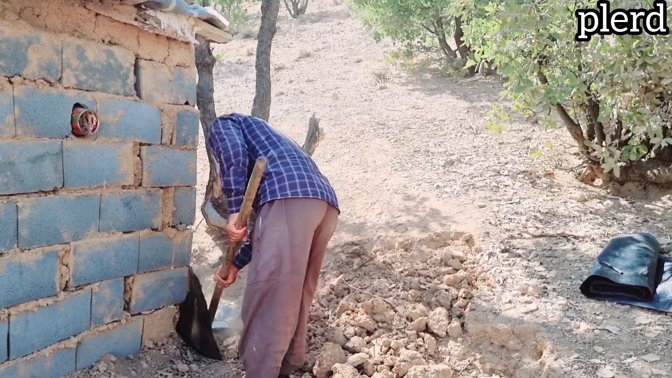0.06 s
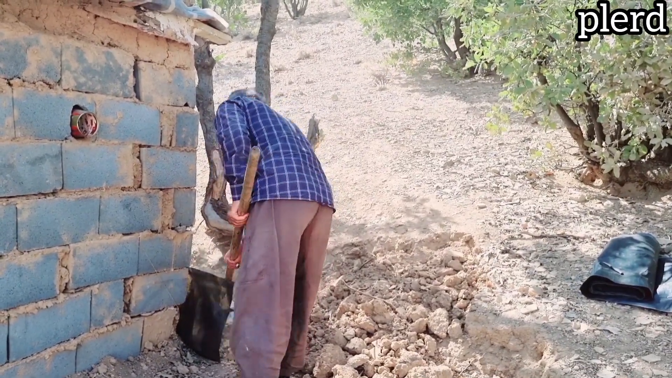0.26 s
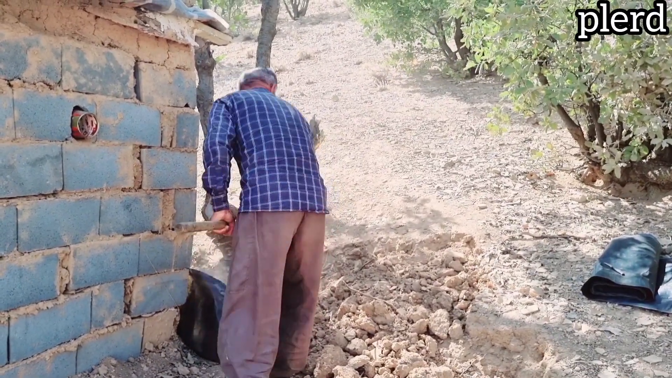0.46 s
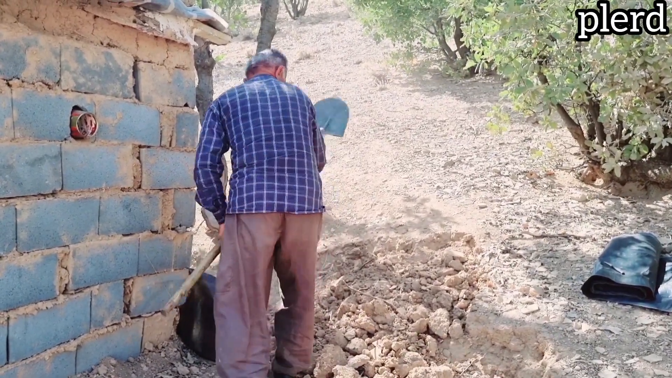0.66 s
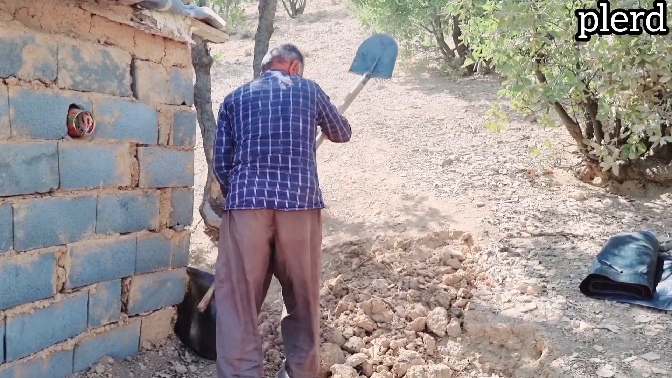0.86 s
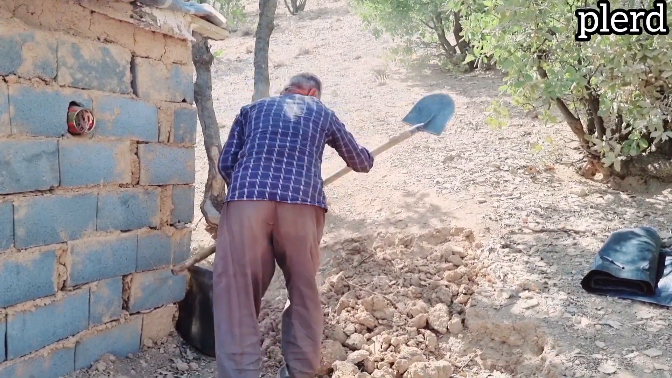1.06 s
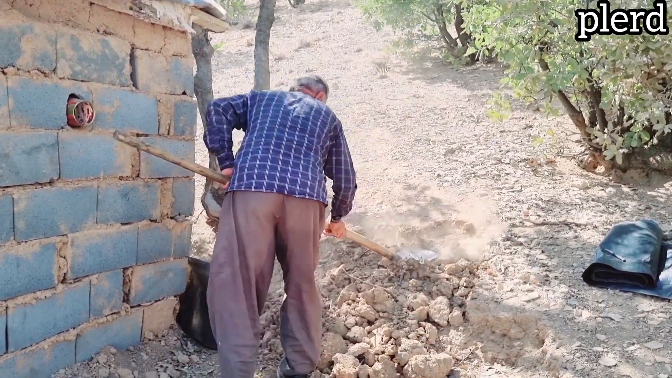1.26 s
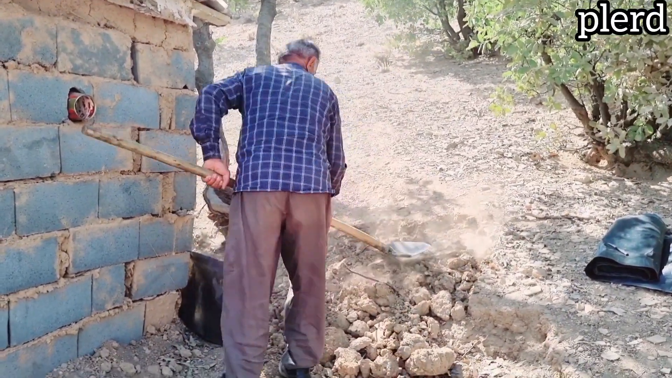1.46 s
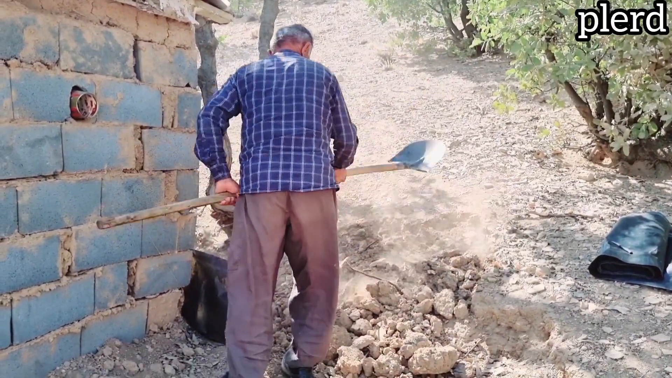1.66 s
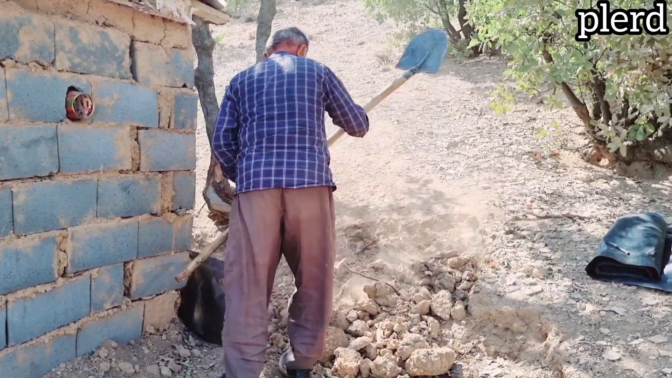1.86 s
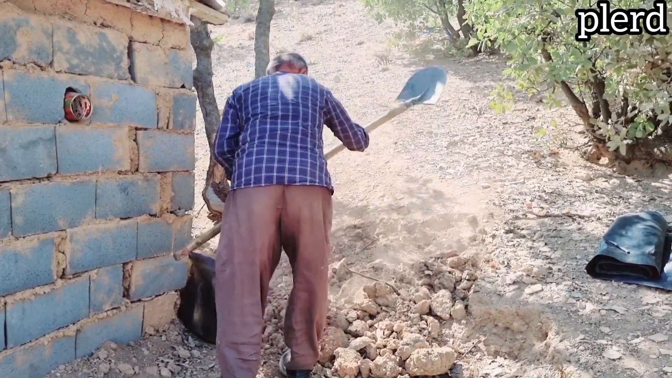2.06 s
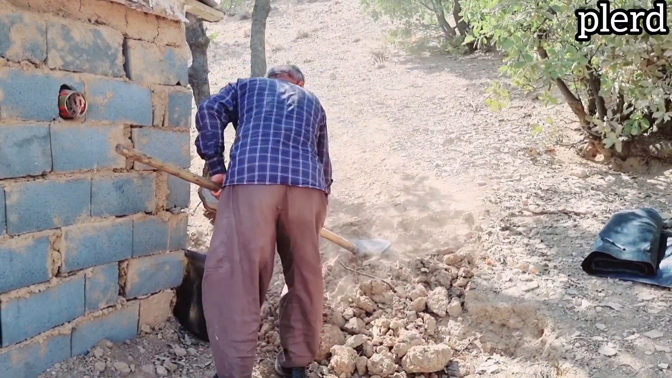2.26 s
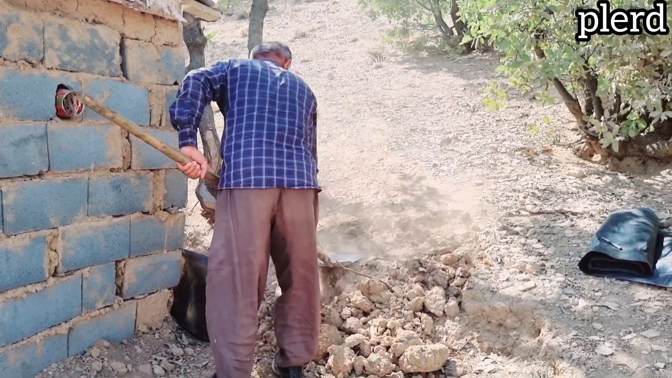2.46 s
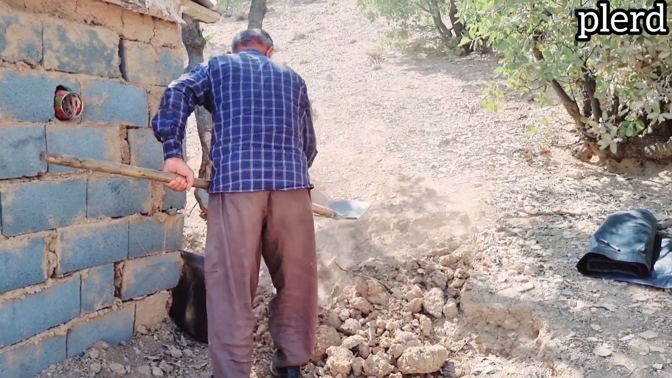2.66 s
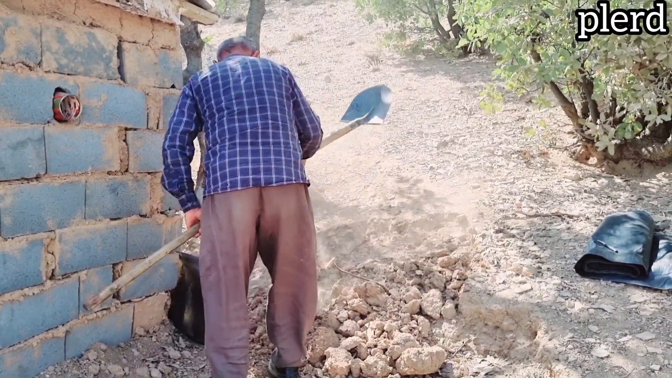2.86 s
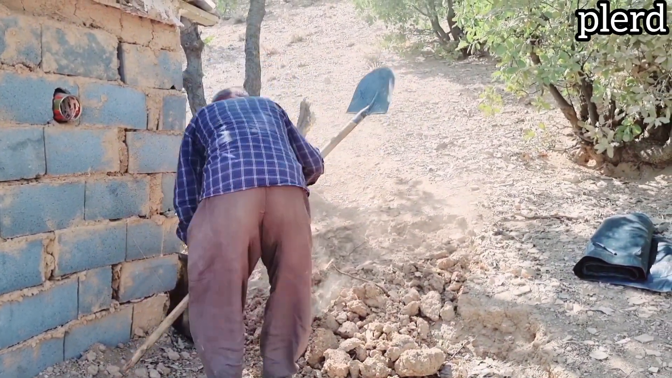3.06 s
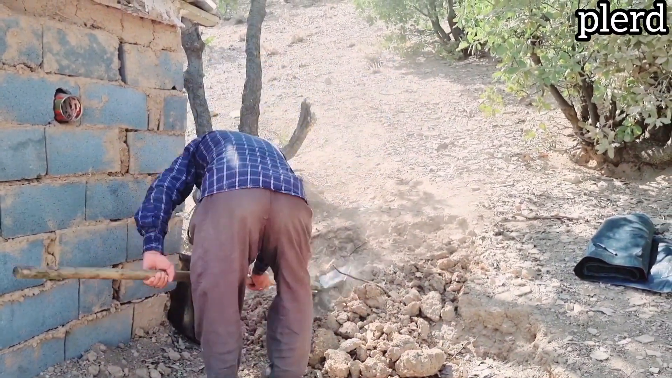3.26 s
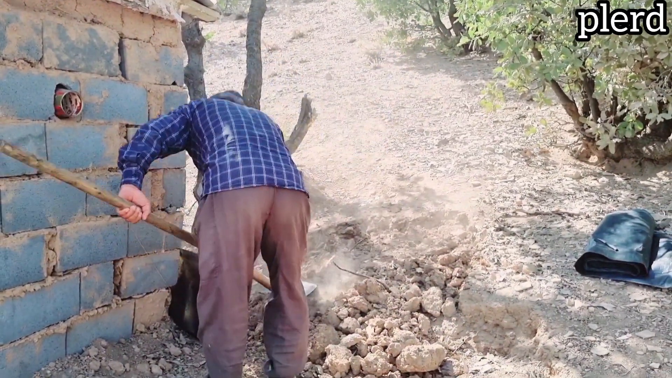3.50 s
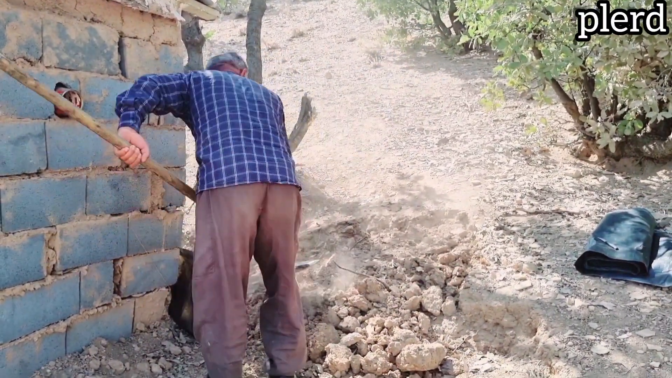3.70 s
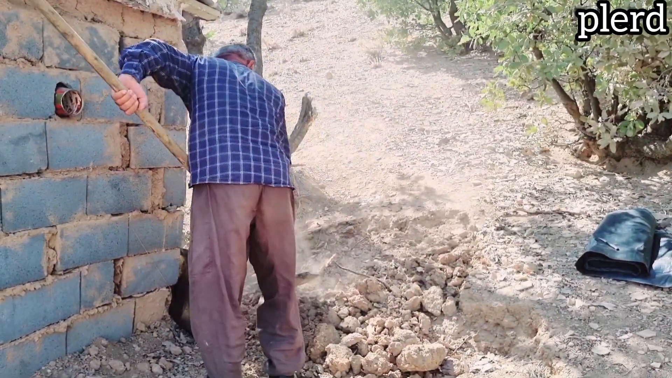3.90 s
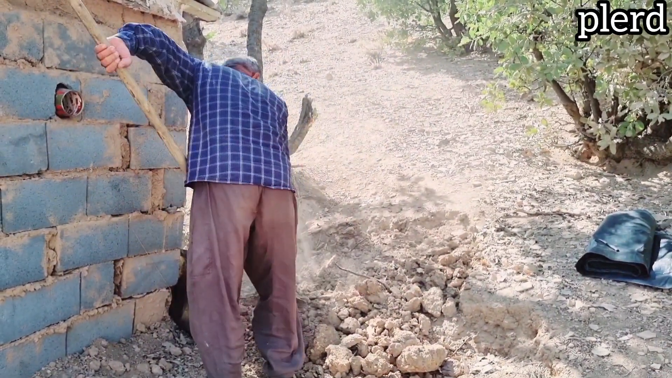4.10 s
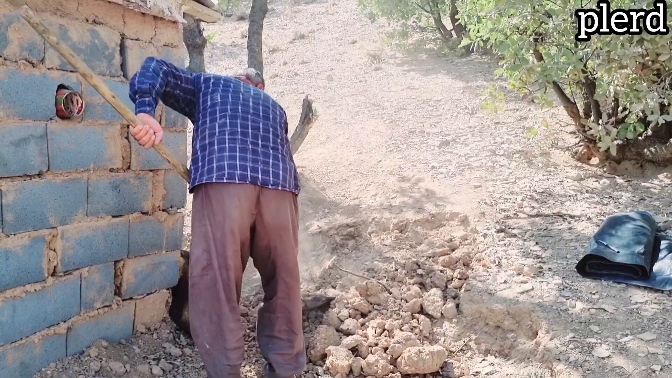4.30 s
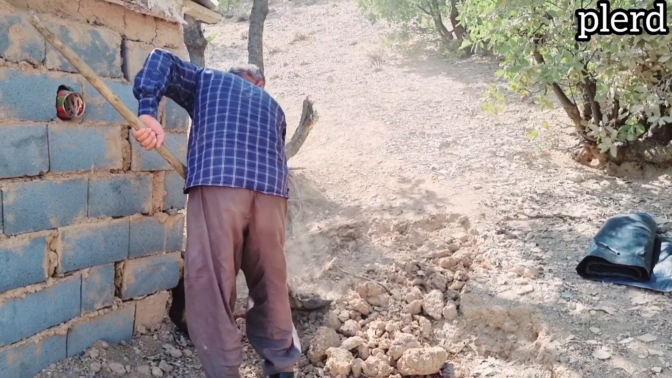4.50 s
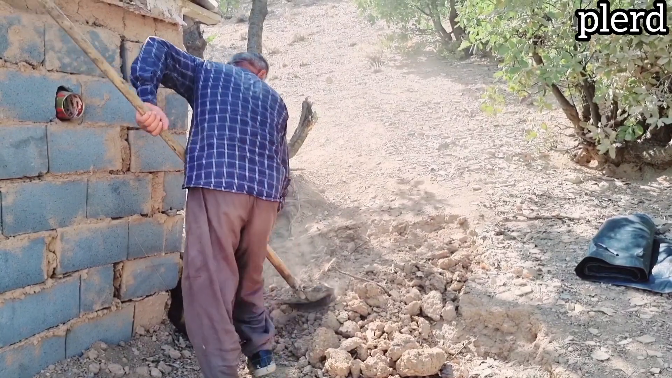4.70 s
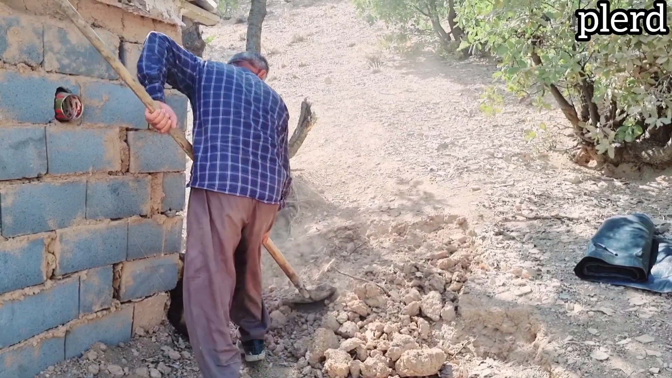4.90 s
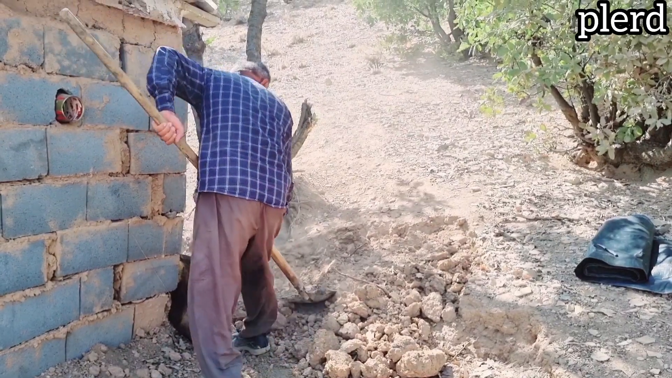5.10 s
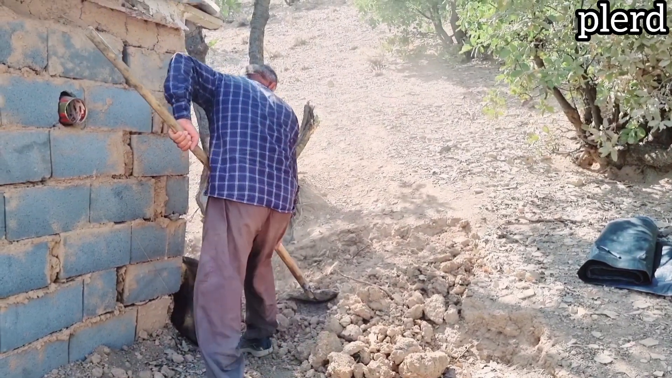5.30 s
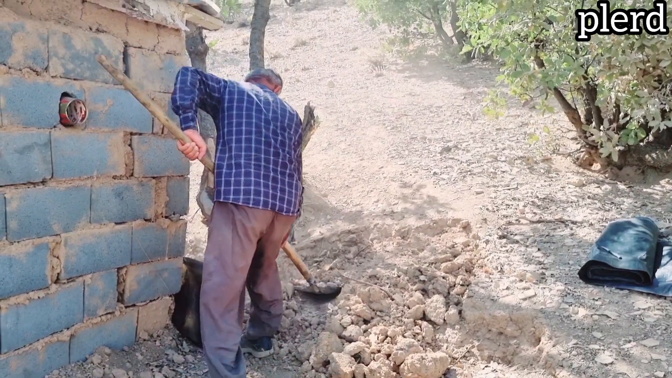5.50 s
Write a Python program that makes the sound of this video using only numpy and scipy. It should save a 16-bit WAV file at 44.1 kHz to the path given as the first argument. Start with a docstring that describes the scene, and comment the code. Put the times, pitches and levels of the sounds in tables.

```python
"""Shovel digging in stony ground

A long-handled steel shovel is swung like a pick, three times, into dry stony ground beside a block wall.
Each blow is crackling noise, a grinding blade, a low sine thud and a ring of decaying steel modes.
Between and after the blows the blade shoves, jabs and scrapes: filtered noise grains, pebbles and clinks.
Boots shuffle and short bright swishes flutter in shaped grains; wind, boots and soil rumble low in
filtered noise, and a far rooster is gliding tones."""
import sys
import numpy as np
from scipy import signal
from scipy.fft import rfft, irfft, next_fast_len
from scipy.io import wavfile

SR = 44100
rng = np.random.default_rng(int(sys.argv[2]) if len(sys.argv) > 2 else 0)


def inscribe(sig):
    """Save sig as 16-bit PCM at rate SR to the path in sys.argv[1].

    A 1-D sig is mono; a 2-D sig holds one channel per row.
    Samples are clipped to [-1, 1] before scaling.
    """
    pcm = np.round(np.clip(np.atleast_2d(sig).T, -1, 1) * 32767)
    wavfile.write(sys.argv[1], SR, pcm.astype(np.int16))


N = 244710
T = np.arange(N) / SR
LEFT_RIGHT = np.array([[1], [-1]])


def amp(db):
    """Decibels to gain."""
    return 10 ** (np.asarray(db) / 20)


def unit(x):
    """Scale to rms 1."""
    return x / np.sqrt(np.mean(x ** 2))


def fade(t, t60):
    """Exponential decay from t = 0, falling 60 dB in t60 seconds."""
    return np.exp(-np.log(1000) * np.maximum(t, 0) / t60)


def curves(rows):
    """The columns after start_s, interpolated sample by sample."""
    s, *columns = np.transpose(rows)
    return [np.interp(T, s, column) for column in columns]


def across(points, size):
    """A (pitch_hz, value) table on the bins of a transform, interpolated over log frequency."""
    hz, value = np.transpose(points)
    bin_hz = np.arange(size // 2 + 1) * SR / size
    return np.interp(np.log(bin_hz + 1), np.log(hz), value)


def through(x, response):
    """Pass each channel through an impulse response."""
    response = response.reshape((1,) * (x.ndim - 1) + (-1,))
    return signal.oaconvolve(x, response, axes=-1)[..., :x.shape[-1]]


def colour(x, points):
    """Causal minimum-phase filter with a (pitch_hz, level_db) response."""
    size = 4096
    cepstrum = irfft(np.log(amp(across(points, size))))
    # folding the cepstrum forward in time makes the filter causal
    cepstrum[1:size // 2] *= 2
    cepstrum[size // 2 + 1:] = 0
    return through(x, irfft(np.exp(rfft(cepstrum))))


def noise(n, points):
    """Steady noise with a (pitch_hz, level_db) colour, at rms 1."""
    return unit(colour(rng.standard_normal(n), points))


def wander(n, rate_hz):
    """Smooth random motion, mostly slower than a few times rate_hz, at rms 1."""
    return noise(n, [(rate_hz, 0), (4 * rate_hz, -40)])


def grains(n, per_s, spread_db):
    """Random tiny fractures of either sign and uneven strength, at rms 1."""
    hit = rng.random(n) < per_s / SR
    sign = rng.choice([-1, 1], n)
    strength = amp(spread_db * np.minimum(rng.exponential(size=n), 4))
    return unit(hit * sign * strength)


def scattered(n, per_s, spread_db, side_db):
    """Fractures strewn over the ground: above the bass, each port hears a slightly different share."""
    mid, side = grains(n, per_s, spread_db), grains(n, per_s, spread_db)
    return mid + amp(side_db) * colour(side, [(200, -10.5), (1200, 3.5)]) * LEFT_RIGHT


def add(out, s, x):
    """Mix a sound in at time s."""
    i = max(int(s * SR), 0)
    out[..., i:i + x.shape[-1]] += x[..., :N - i]


def swell(s, rise_s, hold_s, t60):
    """Envelope of one movement: it builds exponentially up to time s, holds and dies away."""
    out = np.zeros(N)
    span = slice(max(int((s - 8 * rise_s) * SR), 0), int((s + hold_s + t60) * SR))
    t = T[span] - s
    out[span] = np.exp(np.minimum(t, 0) / rise_s) * fade(t - hold_s, t60)
    return out


# modes of the steel blade, levels relative:
# pitch_hz, bedded_db (in soil), free_db (ringing free), free_t60_s
BLADE_MODES = [(911, -13.5, -19, .5), (1372, -3.5, 2.5, 0.17), (1442, -6, -11.5, .35),
               (1548, -12, -16.5, .3), (2099, -2, 4, .45), (2235, 1, -5, 1.2), (2373, -9.5, -3, 0.86),
               (2950, -4, -13, .5), (3203, -1.5, -17.5, .5), (3660, -2, 3.5, 0.46), (4226, -6, -4, .5),
               (4420, 1.5, -14.5, .4), (4810, 1.5, 0.5, .35), (4950, -18, -2.5, .4), (5150, 1.5, -7.5, .4),
               (5450, 0, -14.5, .4), (5706, 1.5, -7, 0.4), (6430, -12.5, -12.5, .35),
               (6610, -6.5, -23, .35), (6656, 0.5, -8.5, .35), (7300, -11, -10.5, .3), (7860, 1.5, -10, .3)]


def blade(t, free=False, bedded_t60=0.029):
    """The blade's ring, a sum of sine modes: choked while in the soil, long once it is free."""
    ring = 0
    for hz, bedded_db, free_db, free_t60 in BLADE_MODES:
        level = amp(free_db if free else bedded_db)
        decay = fade(t, free_t60 if free else bedded_t60)
        ring = ring + level * decay * np.sin(2 * np.pi * (hz * t + rng.random()))
    return ring if free else ring / np.linalg.norm(ring)


# the blade shoves loose ground, levering after a blow or jabbing; rise_s is a time constant:
# start_s (top of the rise), rise_s, hold_s, t60_s, grit_db, scrape_db, soil_db
SHOVES = [(0.0, .01, 0.0035, .28, -35.5, -36, -36.5), (1.163, 0.023, 0.026, 0.55, -42, -46, -56.5),
          (1.251, 0.013, .01, 0.1, -40, -47.5, -71), (1.524, 0.0042, 0.0072, .15, -55.5, -66, -75),
          (2.142, .015, 0.13, 0.22, -33.5, -47.5, -57), (2.342, 0.0074, 0.019, 0.25, -41.5, -53.5, -64.5),
          (3.222, 0.025, 0.0069, 0.21, -32, -37, -49), (3.451, .002, 0.0064, 0.19, -38.5, -39.5, -44),
          (3.839, .002, .015, 0.23, -49, -62, -63), (4.11, 0.06, 0.015, 0.17, -54, -67, -67),
          (4.151, 0.002, 0.036, .2, -34.5, -41, -52), (4.195, 0.0072, 0.013, 0.087, -32, -34.5, -43.5),
          (4.626, 0.026, 0.05, 0.14, -33.5, -38, -61), (5.057, 0.071, 0.029, 0.21, -35.5, -41.5, -57.5),
          (5.455, 0.17, 0.011, 0.31, -43, -43, -58.5)]
# boots shift on the soil: start_s (top of the rise), rise_s, hold_s, t60_s, soil_db
SHUFFLES = [(0.693, 0.027, 0.034, .6, -47), (1.607, .01, 0.026, .2, -62), (2.9, 0.042, 0.028, .35, -60),
            (3.41, .015, 0.039, 0.26, -50.5), (3.6, 0.17, 0.12, 1, -61), (4.762, .03, 0.0083, .4, -58)]


def ground_motion(trickle_db=-22, trickle_t60=1.8, boot_grit_db=-10, boot_scrape_db=-6):
    """How strongly grit runs, the blade scrapes and soil shifts; shoves and shuffles add in power."""
    power = np.zeros((3, N))
    for s, rise_s, hold_s, t60, *levels_db in SHOVES:
        push = swell(s, rise_s, hold_s, t60)
        # every shove leaves a weaker, longer trickle
        push += amp(trickle_db) * swell(s, rise_s, hold_s, trickle_t60)
        power += np.outer(amp(levels_db), push) ** 2
    for *shape, db in SHUFFLES:
        levels_db = [db + boot_grit_db, db + boot_scrape_db, db]
        power += np.outer(amp(levels_db), swell(*shape)) ** 2
    return np.sqrt(power)


def pebbles(per_s=190, low_hz=2500, high_hz=6350, t60=.028, spread_db=6.0, scatter_ms=0.099):
    """A stream of small collisions, decaying sines each with its own pitch, size and place."""
    out, t = np.zeros((2, N)), T[:SR // 25]
    for when, pitch, size, place in rng.random((int(per_s * N / SR), 4)):
        hz = low_hz * (high_hz / low_hz) ** pitch
        # the place shifts the sine's phase oppositely at the two ports
        lead_s = LEFT_RIGHT * (2 * place - 1) * scatter_ms / 1000
        level = amp(-spread_db * np.log(size + .02))
        add(out, when * N / SR, level * fade(t, t60) * np.sin(2 * np.pi * hz * (t + lead_s)))
    return unit(out)


# spectrum of running grit: pitch_hz, level_db (relative, per Hz)
GRIT_COLOUR = [(1200, -31.5), (2500, -9.5), (3500, -5.5), (5300, -2), (7400, -3), (9000, -13),
               (12000, -20.5), (16000, -18.5)]
# spectrum of the scraping blade: pitch_hz, level_db (relative, per Hz)
SCRAPE_COLOUR = [(350, -23), (650, -18.5), (880, -0.5), (1130, -15.5), (1450, 1), (1850, -5.5),
                 (2300, -2.5), (2900, -14), (4200, -25.5)]
# spectrum of soil under boots: pitch_hz, level_db (relative, per Hz)
SOIL_COLOUR = [(60, -19.5), (160, -5.5), (340, 1), (520, -7), (750, 0), (1300, -24)]


def rubble(steel_db=-8, catch_db=2.0, pebble_db=-8):
    """Grit sprays and trickles, rubs along the blade in catches and slips; pebbles roll and soil shifts."""
    running, scraping, shifting = ground_motion()
    catch = catch_db * wander(N, 72)
    grit_grains = unit(colour(scattered(N, per_s=4500, spread_db=2.0, side_db=-5.5), GRIT_COLOUR))
    grit = running * amp(catch - 2.3) * grit_grains
    rub_grains = unit(colour(scattered(N, per_s=2000, spread_db=5.5, side_db=-9), SCRAPE_COLOUR))
    rub = scraping * amp(catch - 2.5) * rub_grains
    soil = shifting * amp(0.27) * unit(colour(grains(N, per_s=380, spread_db=3.5), SOIL_COLOUR))
    stones = scraping * amp(pebble_db) * pebbles()
    steel = through(grit + rub, blade(T[:SR // 16]))
    return grit + rub + soil + stones + amp(steel_db) * steel


# short bright swishes; rise_s is a time constant:
# start_s (top of the rise), rise_s, hold_s, t60_s, level_db (before flutter)
SWISHES = [(0.0, 0.012, .02, 0.8, -45.5), (0.307, 0.038, .095, 0.14, -50), (0.55, 0.024, .22, .45, -59),
           (1.275, .03, .01, 0.98, -54.5), (1.609, 0.014, .03, .2, -53.5), (2.427, .05, .03, .7, -60),
           (2.89, .05, .04, 0.44, -54.5), (4.191, .012, 0.017, .12, -39.5), (4.27, .006, 0.03, 0.14, -53)]
# spectrum of the swishes: pitch_hz, level_db (relative, per Hz)
SWISH_COLOUR = [(400, -4), (1000, 2), (2500, -4), (5000, -4.5), (7500, 0.5), (9500, -8.5), (15000, -4)]


def swishes(flutter_db=2.9):
    """Short bright swishes: a fluttering hiss of dense grains."""
    swells = sum(amp(db) * swell(*shape) for *shape, db in SWISHES)
    flutter = amp(flutter_db * wander(N, 50))
    hiss = unit(colour(scattered(N, per_s=6500, spread_db=3.5, side_db=-3), SWISH_COLOUR))
    return swells * flutter * hiss


# low rumble in two bands, before the two gains and the slow swaying:
# start_s, deep_db (deep wind rumble), upper_db (upper-bass rumble of wind, boots and soil)
RUMBLE = [(0.0, -64, -53.5), (0.51, -58, -57), (1.45, -66, -65), (3.21, -68, -63.5), (3.96, -77.5, -73.5),
          (5.07, -63.5, -54.5), (5.55, -80, -53)]
# spectrum of the deep wind rumble: pitch_hz, level_db (relative, per Hz)
DEEP_COLOUR = [(20, -20), (32, -6.5), (48, 0.5), (70, -1.5), (110, -15.5), (300, -47)]
# spectrum of the upper-bass rumble: pitch_hz, level_db (relative, per Hz)
UPPER_COLOUR = [(45, -22.5), (85, -3), (140, 1), (220, -7.5), (500, -30)]


def low_rumble(deep_gain_db=4, upper_gain_db=2, sway_db=1.5):
    """Low noise in two bands: deep wind rumble, and upper-bass rumble of wind, boots and soil."""
    deep_db, upper_db = curves(RUMBLE)
    deep = amp(deep_db + deep_gain_db) * noise(N, DEEP_COLOUR)
    upper = amp(upper_db + upper_gain_db) * noise(N, UPPER_COLOUR)
    # both bands rise and fall together
    return (deep + upper) * amp(sway_db * wander(N, 5.1))


# spectrum of still air: pitch_hz, level_db (relative, per Hz)
AIR_COLOUR = [(60, -12), (130, -4), (280, -15), (450, -16), (800, -25), (1500, -24), (3000, -35),
              (6000, -39), (9000, -43), (16000, -46.5)]


def still_air(level_db=-64.5):
    """A steady, faint, slightly wide bed of coloured noise."""
    mid, side = noise(N, AIR_COLOUR), noise(N, AIR_COLOUR)
    return amp(level_db) * (mid + .16 * side * LEFT_RIGHT)


def chatter(t, hz, width):
    """One resonance of a stone, shaken by a rattling contact: noise peaked around hz."""
    resonance = [(hz / (1 + 4 * width), -32), (hz / (1 + width), -9), (hz, 0),
                 (hz * (1 + width), -9), (hz * (1 + 4 * width), -32)]
    return noise(len(t), resonance)


# spectrum of crushing stone: pitch_hz, level_db (relative, per Hz)
CRUSH_COLOUR = [(100, -17), (300, -12), (480, -25.5), (800, -8.5), (1000, -7), (1150, -21.5), (1450, -7),
                (2700, -6.5), (5300, -2), (7600, -4), (9000, -14), (12000, -11), (16000, -19)]
# stones clinking: start_s, level_db (before gain_db), pitch_hz,
# chip_db (chip noise, relative), steel_db (blade share, relative)
CLINKS = [(0.036, -30.5, 920, -6, -16.5), (0.707, -47, 3640, -3, -1), (1.625, -39, 2220, -1, -3),
          (2.06, -52, 5850, 12.5, 16), (2.258, -25, 4360, -24, 10), (2.393, -38.5, 4870, -2.5, -20),
          (3.084, -27.5, 1260, -1.5, -17.5), (3.39, -37, 820, -1, -15), (3.451, -25.5, 1520, -2, 1.5),
          (3.749, -36, 5360, -3, -23.5), (4.149, -43.5, 2390, 8.5, 18), (4.208, -21, 5130, -4, -7),
          (4.312, -33.5, 5200, 3, -18), (4.364, -32, 1550, -20, 3), (4.43, -34.5, 5480, 4.5, -9),
          (4.453, -31.5, 1450, -14, 2), (4.61, -25.5, 4570, -18, 16.5), (4.646, -31.5, 1470, -15, -10),
          (4.661, -16.5, 1560, -26, -11), (4.689, -21.5, 5660, 2, -30), (4.764, -31, 1610, -15, -18),
          (4.825, -30.5, 5400, -3, -18), (4.927, -42, 5440, 1, -10), (4.951, -30, 4450, 2, -10),
          (5.065, -24.5, 2420, -13, 12.5), (5.18, -38, 5130, -12, -5), (5.214, -39, 2250, -19, 0),
          (5.342, -41, 1410, 8, 13), (5.507, -31.5, 1680, -11, 1)]


def clinks(rattle_s=0.0025, ring_t60=0.026, chip_t60=0.032, gain_db=-6,
           width=0.097, body_ratio=.6, body_db=-13):
    """A stone chatters around its pitch and a lower body tone, sheds chips and touches the blade."""
    out, t = np.zeros((2, N)), T[:SR // 16]
    for s, db, hz, chip_db, steel_db in CLINKS:
        tone = chatter(t, hz, width) + amp(body_db) * chatter(t, body_ratio * hz, width)
        ring = tone * fade(t - rattle_s, ring_t60)
        chip_grains = scattered(len(t), per_s=8100, spread_db=-5.0, side_db=5.5)
        chips = unit(colour(chip_grains, CRUSH_COLOUR)) * fade(t, chip_t60)
        steel = blade(t)
        clink = ring + amp(chip_db) * chips + amp(steel_db) * steel / np.abs(steel).max()
        onset = np.minimum(t / 0.0012, 1)
        add(out, s, amp(db + gain_db) * clink * onset)
    return out


# dull knocks of boots and clods: start_s, level_db (before gain_db), pitch_hz
KNOCKS = [(0.036, -31.5, 360), (0.7, -28.5, 272.2), (0.713, -32, 220), (2.59, -52, 414), (3.43, -50, 290),
          (3.448, -37.5, 120), (3.521, -35.5, 333), (4.204, -36, 447), (4.211, -28.5, 877)]


def knocks(t60=.045, gain_db=1):
    """Soft, heavily damped bumps on the soil: a short sine with a little soil noise."""
    out, t = np.zeros(N), T[:SR // 4]
    for s, db, hz in KNOCKS:
        body = np.sin(2 * np.pi * hz * t) + 0.22 * noise(len(t), SOIL_COLOUR)
        onset = np.minimum(t / .001, 1)
        add(out, s, amp(db + gain_db) * body * fade(t, t60) * onset)
    return out


def glides(calls, harmonics_db, waver, fading_db=2.5):
    """Slightly unsteady harmonic tones, each along its pitch and level curve."""
    out = np.zeros(N)
    for rows in calls:
        s, hz, db = np.transpose(rows)
        t = T[int(s[0] * SR):int(s[-1] * SR)]
        pitch_hz = np.interp(t, s, hz) * (1 + waver * wander(len(t), 70))
        phase = 2 * np.pi * np.cumsum(pitch_hz) / SR
        tone = sum(amp(h) * np.sin(k * phase) for k, h in enumerate(harmonics_db, 1))
        level = amp(np.interp(t, s, db) + fading_db * (wander(len(t), 15) - .5))
        gate = np.clip(np.minimum(t - t[0], t[-1] - t) / .005, 0, 1)
        add(out, s[0], gate * level * tone)
    return out


# short low creaks, one curve each: start_s, pitch_hz, level_db (before waver and fading)
CREAKS = [
    [(.105, 358, -58), (.125, 360, -40), (.16, 255, -49)],
    [(.74, 270.5, -51), (.79, 345, -44), (.84, 293, -49)],
]


def creaks():
    """Short low creaks: three harmonics with a rough, wavering pitch."""
    return glides(CREAKS, [0, -10, -11], waver=0.034)


# far rooster, one curve per call: start_s, pitch_hz, level_db (before waver and fading)
CROWS = [
    [(.36, 706, -71), (.5, 723, -65), (.85, 749, -65.5), (1.08, 715, -66)],
    [(1.62, 794, -61), (1.8, 780, -76), (2.05, 765, -80)],
]


def crows():
    """A far rooster: four strong harmonics on a gliding pitch."""
    return glides(CROWS, [-8.0, -4.5, -3.0, -5.0], waver=0.005)


# thin squeaks and far whistles, one curve each: start_s, pitch_hz, level_db (before waver and fading)
WHISTLES = [
    [(.704, 3450, -42), (.72, 3530, -41), (.738, 3420, -48)],
    [(.705, 4740, -48), (.74, 4740, -55)],
    [(.705, 2130, -51), (.74, 2100, -50)],
    [(2.55, 2250, -71), (2.68, 2226, -64), (2.82, 2230, -70)],
    [(2.96, 3120, -77.5), (3.01, 2900, -70.5), (3.07, 2580, -76)],
]


def whistles():
    """Thin squeaks and far whistles: single gliding sines."""
    return glides(WHISTLES, [0], waver=0.0063)


def grinding(t, jitter_hz=45):
    """The blade's modes driven by grinding stone; the shifting contact smears their pitch."""
    modes = 0
    for hz, bedded_db, *_ in BLADE_MODES:
        cycles = np.cumsum(hz + jitter_hz * wander(len(t), 160)) / SR + rng.random()
        modes = modes + amp(bedded_db) * np.sin(2 * np.pi * cycles)
    return unit(modes)


def ports(x, lead_ms):
    """A sound from one side reaches one port first; a positive lead favours the left."""
    n = x.shape[-1]
    # half the lead goes to each port
    turn = np.exp(1j * np.pi * np.arange(n // 2 + 1) * SR / n * lead_ms / 1000)
    return irfft(rfft(x) * np.array([turn, 1 / turn]), n)


# blows, levels before tone: start_s, crack_db, crush_db, length_s (crush hold), t60_s (settling),
# thud_db, ring_db (free ring), lead_ms (left lead)
BLOWS = [(1.0861, -6.5, -13.5, 0.0059, 0.13, -33.5, -45, -0.089),
         (2.117, -19.5, -17.5, 0.015, 0.084, -34, -42, -0.066),
         (3.1395, -22, -15, 0.011, 0.12, -31.5, -49.5, -0.0087)]
# pitches of the tone curves: pitch_hz
TONE_HZ = [300, 900, 1450, 2200, 3200, 4400, 6800, 11000]
# each blow meets other stones, one row per blow: level_db at each tone pitch
BLOW_TONE = [(5.5, 5, 7, -2.5, 0, 1, 5, 4), (5.5, 4, -3.5, -2, 1.6, 7.5, -2.5, 2),
             (-1, -1, 6.5, 7, -1.1, 0.73, 2.5, -0.5)]


def blows(crack_t60=0.01, bite_s=0.0054, steel_db=-4.0, stone_db=-2, thud_hz=62, thud_t60=0.056):
    """The edge bites, cracks on stone, crushes its way in and stops with a thud; the blade rings on."""
    out, t = np.zeros((2, N)), T[:SR // 5] - bite_s
    for (s, crack_db, crush_db, length, t60, thud_db, ring_db, lead_ms), tone in zip(BLOWS, BLOW_TONE):
        # the loose crust gives way just before the edge meets the stone
        crush = amp(crush_db) * fade(-t, 1.5 * bite_s) * fade(t - length, t60)
        crack = amp(crack_db) * fade(t, crack_t60) * (t > 0)
        fractures = scattered(len(t), per_s=18000, spread_db=6, side_db=-11.5)
        stone = (crack + amp(stone_db) * crush) * unit(colour(fractures, CRUSH_COLOUR))
        steel = amp(steel_db) * crush * grinding(t)
        hit = colour(stone + steel, list(zip(TONE_HZ, tone)))
        # the ground gives way more slowly than the stone breaks
        thud_shape = np.clip(t / 0.011, 0, 1) * fade(t - .02, thud_t60)
        thud = amp(thud_db) * np.sin(2 * np.pi * thud_hz * t) * thud_shape
        add(out, s - bite_s, ports(hit + thud, lead_ms))
        add(out, s, amp(ring_db) * blade(T[:SR], free=True))
    return out


# the blade flicks free of a stone: start_s, level_db (scales the modes), pitch_hz (favoured region)
RELEASES = [(1.325, -39, 1350), (2.39, -70, 2395), (3.235, -43.5, 2475), (3.843, -60.5, 2170)]


def releases(reach_octaves=0.093, rise_s=0.03):
    """Pulled clear of the soil, the blade sings on in the modes nearest the last contact."""
    out, t = np.zeros(N), T[:SR]
    for s, db, centre_hz in RELEASES:
        ring = np.zeros(len(t))
        for hz, _, free_db, t60 in BLADE_MODES:
            octaves = np.log2(hz / centre_hz)
            if abs(octaves) < .5:
                level = amp(free_db) * np.exp(-(octaves / reach_octaves) ** 2)
                ring += level * fade(t, t60) * np.sin(2 * np.pi * hz * t)
        add(out, s, amp(db) * ring * np.minimum(t / rise_s, 1))
    return out


def yard(x, near_db=-12, near_t60=0.043, far_db=-25, far_t60=0.42):
    """The wall and rough ground scatter early echoes; trees and slope return a faint tail."""
    t, sides = T[:SR // 2], []
    near_colour = [(200, -19.0), (1200, 10.5), (16000, 4.0)]
    far_colour = [(200, -15.5), (2000, -12.5), (6000, -9.5), (14000, -6.5)]
    for _ in range(2):
        near = colour(rng.standard_normal(len(t)), near_colour) * fade(t, near_t60) * (t > .002)
        far = colour(rng.standard_normal(len(t)), far_colour) * fade(t, far_t60) * (t > .02)
        near_echo = amp(near_db) * near / np.linalg.norm(near)
        far_echo = amp(far_db) * far / np.linalg.norm(far)
        sides.append(through(x, near_echo + far_echo))
    return np.array(sides)


def scene():
    """The digging with its echoes, over the low rumble, still air and far calls."""
    digging = rubble() + swishes() + clinks() + knocks() + blows() + releases()
    surroundings = low_rumble() + still_air() + creaks() + crows() + whistles()
    return digging + yard(digging.mean(axis=0)) + surroundings


# phase between the two microphone ports: pitch_hz, left_lead_rad
PORT_PHASE = [(200, 0.23), (500, 0.56), (1000, 0.49), (1400, 1.4), (1850, 2), (2100, 1.85), (2600, 0.69),
              (3300, 1.84), (4400, 0.81), (5200, 0.9), (5700, 1.46), (7500, 2.5), (16000, 2.2)]
# balance of the two ports: pitch_hz, left_minus_right_db
PORT_BALANCE = [(60, 2.2), (110, 1.5), (200, 0.5), (380, 0.5), (700, 2.5), (1290, 0.5), (2380, -1.7),
                (4400, -1.2), (8120, 0.5), (15000, -1.0)]


def record(dry, top_hz=16000):
    """Two microphone ports differ in phase and level; the loudest peaks are rounded and the top is cut."""
    size = next_fast_len(N + 4096)
    # each port takes half of the difference
    half_turn = np.exp(.5j * across([(80, 0)] + PORT_PHASE, size))
    half = half_turn * amp(across(PORT_BALANCE, size) / 2)
    heard = irfft(rfft(dry, size) * np.array([half, 1 / half]), size)[:, :N]
    low_pass = signal.ellip(10, .2, 80, top_hz, fs=SR, output="sos")
    return signal.sosfilt(low_pass, np.tanh(heard))


dry = scene()
out = record(dry)
inscribe(out)
```